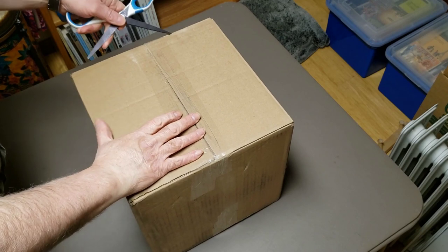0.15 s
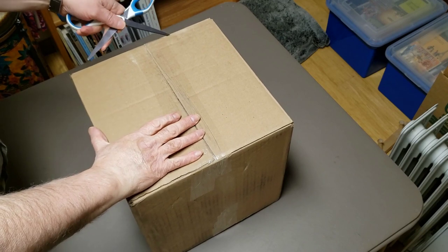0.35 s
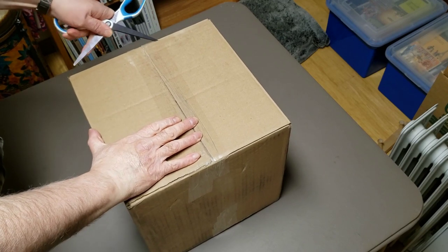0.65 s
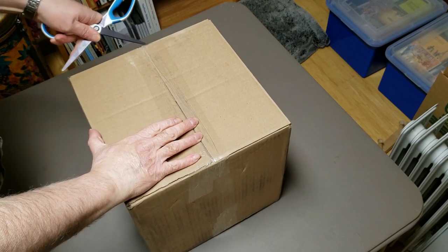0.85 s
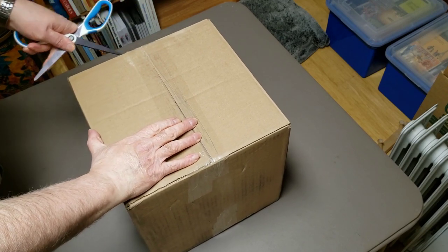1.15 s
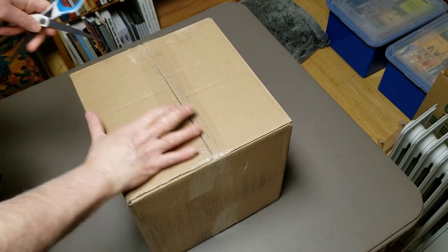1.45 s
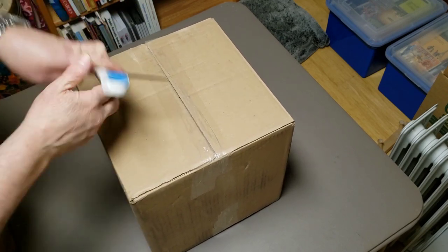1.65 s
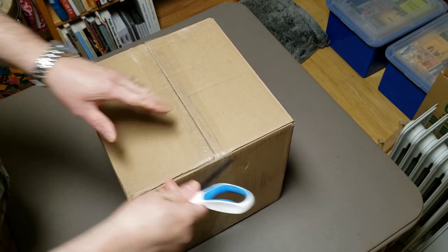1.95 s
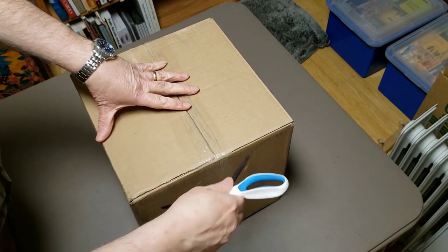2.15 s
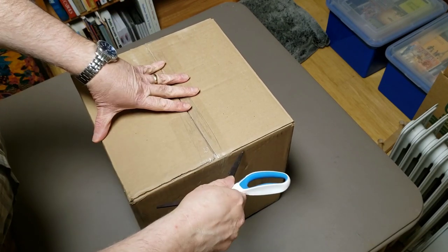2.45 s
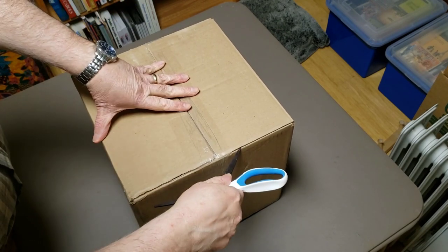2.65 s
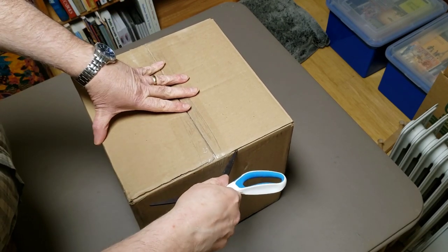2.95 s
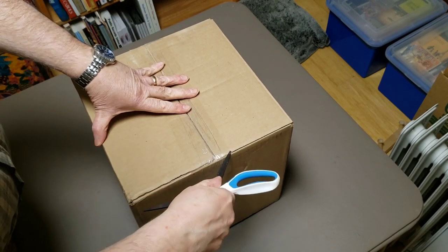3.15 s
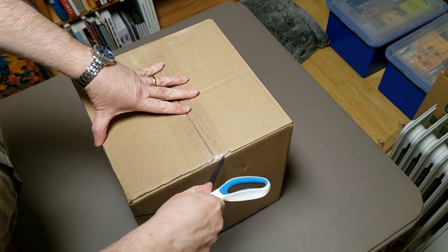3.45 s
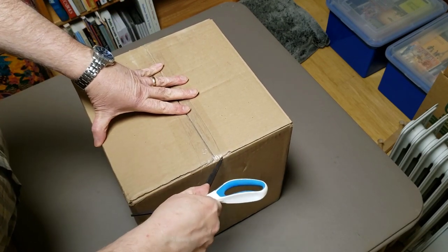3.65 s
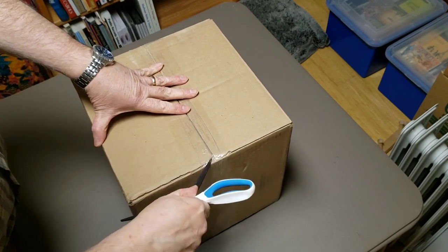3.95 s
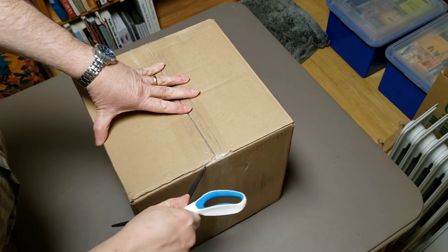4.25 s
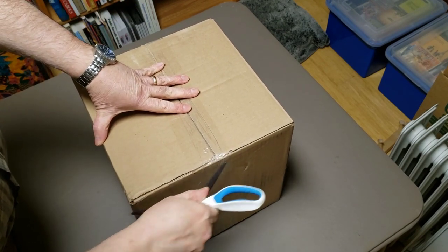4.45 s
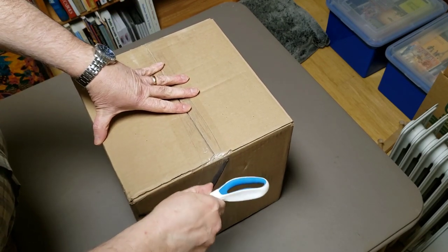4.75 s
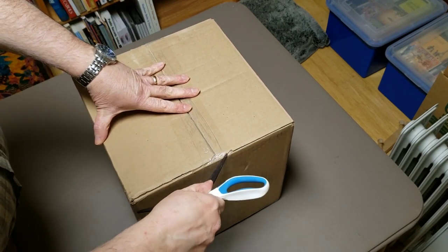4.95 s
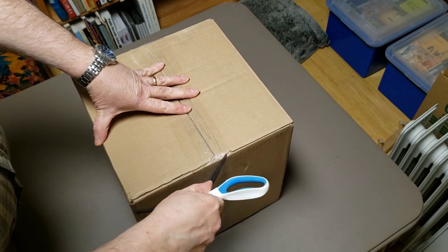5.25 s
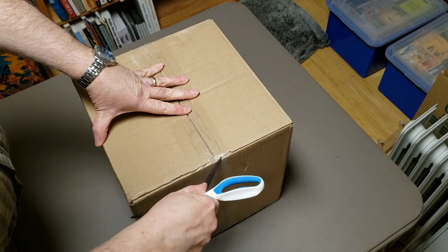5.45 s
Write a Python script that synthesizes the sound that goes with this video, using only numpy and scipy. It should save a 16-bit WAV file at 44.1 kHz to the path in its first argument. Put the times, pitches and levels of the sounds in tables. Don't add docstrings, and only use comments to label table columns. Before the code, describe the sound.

A hand rubs faintly on a cardboard box, then a scissor blade slits the taped lid in loud, uneven jerks, with sharp tape cracks, dry scraping and hollow panel booms. After a near pause with small metal clicks, the blade picks and knocks at the front wall in separated bursts, ending in a stronger push. Close stereo microphone, small furnished room, short reflections and faint hiss.

```python
import sys
import numpy as np
from scipy import signal
from scipy.fft import rfft, irfft, next_fast_len
from scipy.io import wavfile
from scipy.ndimage import uniform_filter1d, map_coordinates

SR = 44100
rng = np.random.default_rng(int(sys.argv[2]) if len(sys.argv) > 2 else 0)


def dump(signal):
    limited = np.clip(np.atleast_2d(signal).T, -1, 1)
    pcm = np.round(limited * 32767).astype(np.int16)
    wavfile.write(sys.argv[1], SR, pcm)


def nominal_scale(level):
    x = np.asarray(level, float) / 20
    return 10 ** x


N = 247401


def unit(x):
    return x / np.sqrt(np.mean(x ** 2) + 1e-20)


def along(points, hz):
    f, v = np.transpose(points)
    return np.interp(np.log(hz + 1), np.log(f + 1), v)


def colour(points):
    return lambda hz: nominal_scale(along(points, hz))


def wobble(rate):
    knots = rng.standard_normal(int(N * rate / SR) + 4)
    return map_coordinates(knots, [np.arange(N) * rate / SR])


def filtered(x, response):
    m = 2 * next_fast_len(N // 2 + SR // 4)
    return irfft(rfft(x, m) * response(np.fft.rfftfreq(m, 1 / SR)), m)[..., :N]


def resonances(modes):
    def response(f):
        total = 0
        for k, (centre, width, db) in enumerate(modes):
            damping = 1j * f * width
            total = total + (-1) ** k * nominal_scale(db) * damping / (centre * centre - f * f + damping)
        return total
    return response


def causal(points):
    def response(hz):
        cepstrum = irfft(np.log(nominal_scale(along(points, hz))))
        half = len(cepstrum) // 2
        return np.exp(rfft(np.r_[cepstrum[0], 2 * cepstrum[1:half], np.zeros(half)]))
    return response


def sides(db):
    return nominal_scale(np.array([db / 2, -db / 2]))


# (frequency [Hz], likeness [0-1])
ALIKE = [(60, 0.86), (200, 0.99), (500, 0.85), (1000, 0.15), (3000, 0.18), (7000, 0.26), (10000, 0.83),
         (15000, 1)]


def spread(pair, response, alike):
    turn = lambda hz: np.arccos(np.clip(along(alike, hz), -1, 1)) / 2
    same, other = filtered(pair, lambda hz: response(hz) * [np.cos(turn(hz)), np.sin(turn(hz))])
    return unit(np.array([same + other, same - other]))


# (time [s], left over right [dB])
PLACE = [(0, -12), (1.4, -4), (1.6, -9.5), (2.3, -5.5), (3.3, -11.5), (4.4, -10), (5.61, -14)]


def blade_place(s):
    return sides(np.interp(s, *np.transpose(PLACE)))


def grit(per_s, spread_db, smooth):
    draw = rng.random((2, 2, N))
    sizes = nominal_scale(-spread_db * np.log(draw[1] + 0.21))
    slips = (draw[0] < per_s / SR) * sizes * np.sign(rng.standard_normal((2, N)))
    return np.sqrt(1 - smooth) * unit(slips) + np.sqrt(smooth) * rng.standard_normal((2, N))


def patchy(pair, depth_db):
    z = signal.stft(pair, nperseg=256)[2]
    field = uniform_filter1d(rng.standard_normal(z.shape[1:]), size=4, axis=0)
    field = uniform_filter1d(field, size=7, axis=1)
    return signal.istft(z * nominal_scale(depth_db * unit(field)), nperseg=256)[1][:, :N]


def contact(rows, fall_db_s, idle_db, shared):
    t = np.arange(0, N + 20, 20) / SR
    idle = idle_db + 6.5 * wobble(11.0)
    s, swell_s, hold_s, db, share_db = np.transpose(rows)[..., None]
    before = np.clip(s - t, 0, None)
    after = np.clip(t - s - hold_s, 0, None)
    swell_db = 25 * (before / np.clip(swell_s, .004, None)) ** 1.42
    level_db = db + shared * share_db - swell_db - fall_db_s * after
    power = nominal_scale(2 * level_db).sum(axis=0)
    return np.sqrt(nominal_scale(2 * idle) + np.interp(np.arange(N) / SR, t, power))


# (from [s], to [s])
BLADE_ON_LID = [
    (0, 1.95),
]


def lid_then_front(lid, front, spans=BLADE_ON_LID):
    t = np.arange(N) / SR
    inside = np.any([(start <= t) & (t < end) for start, end in spans], axis=0)
    return np.where(inside, lid, front)


# (centre [Hz], width [Hz], level [dB])
PANELS = [(151.5, 9.2, 1), (190.4, 25, -1.5), (229.4, 32.3, 0.5), (293.8, 23, 4), (367, 30, 1.5),
          (455, 74, -4), (545, 65, -4.5), (770, 41, -6), (1084, 220, -14.5)]
# (centre [Hz], width [Hz], level [dB])
FRONT = [(141, 22, -8.5), (172, 26, -6), (225.2, 16.6, -0.5), (255.4, 15.6, -2.5), (288, 14.3, -5.5),
         (347.5, 13.2, -7.5), (451, 33, -21), (557, 37, -14.5), (757, 194, -25.5)]
# (centre [Hz], width [Hz], level [dB])
SIDE_WALL = [(155, 49, -13), (240, 17, -0.5), (300.4, 20.6, 0.5), (334, 13, -4.5), (425, 50, -14.5),
             (600, 130, -16.5), (727, 124, -16), (1126, 67, -20.5)]
# (from [s], to [s])
ON_LID = [
    (0, .4),
    (.645, 1.95),
    (4.81, 4.95),
]
# (from [s], to [s])
ON_SIDE_WALL = [
    (.4, .645),
    (2.1, 2.315),
]


def panel_modes(through):
    flat = lid_then_front(through(PANELS), through(FRONT), ON_LID)
    return lid_then_front(through(SIDE_WALL), flat, ON_SIDE_WALL)


# (frequency [Hz], density [dB per Hz])
HUSH = [(15, -27), (25, 3.5), (409, -3.5), (444, -2), (537, -6.5), (582, -10), (1120, -10), (2970, -12.5),
        (9280, -26.5), (15100, -12), (16400, -38)]
# (frequency [Hz], likeness [0-1])
HUSH_ALIKE = [(100, 0.28), (1000, 0.034), (5000, 0.032), (15000, 0.18)]


def hush():
    return nominal_scale(-64) * spread(rng.standard_normal((2, N)), colour(HUSH), HUSH_ALIKE)


# (frequency [Hz], time to fall 60 dB [s])
ROOM = [(150, 0.29), (1000, 0.21), (4000, 0.24), (10000, 0.28), (16000, 0.67)]
# (time [s], level [dB])
WALLS = [(.0065, -11), (.0085, 1.5), (0.018, -2), (.018, -5)]


def room(x, echo_db, tail_db):
    hz, t, z = signal.stft(rng.standard_normal((3, SR // 2)), SR, nperseg=256)
    apart = np.sqrt(1 - np.clip(along(ALIKE, hz), 0, 1))[:, None]
    z = z[2] + z[:2] * apart * 4.7
    tail = signal.istft(z * nominal_scale(-60 * t / along(ROOM, hz)[:, None]), SR, nperseg=256)[1]
    tail = nominal_scale(tail_db) * tail / np.linalg.norm(tail[0])
    answer = np.pad(tail, ((0, 0), (250, 0)))
    for s, db in WALLS:
        answer[:, round(s * SR)] += nominal_scale(db + echo_db)
    return signal.fftconvolve(x, answer, axes=1)[:, :N]


# (time [s], peak level [dB], thud share [dB])
KNOCKS = [(0.067, -63, -11), (0.45, -15, -17), (0.689, -22, -18), (0.74, -17.5, -34), (0.822, -51, -11),
          (1.155, -13, -33), (1.253, -25, -6), (2.156, -38, -30), (2.18, -15.5, -34), (2.326, -31.5, -8),
          (2.619, -45, -10), (2.939, -44, -15), (2.983, -36.5, -15), (3.038, -22, -23), (3.233, -29.5, -23),
          (3.415, -26.5, -27), (3.711, -37, -25), (3.742, -15.5, -23), (3.775, -14.5, -7),
          (4.182, -34, -11), (4.657, -36, -17), (4.827, -39, -19), (5.019, -30, 4), (5.345, -35.5, -23),
          (5.431, -23, -20), (5.488, -19, -17), (5.539, -17.5, -17),
          (0.488, -18.5, -22), (0.509, -38, -20), (.522, -15, -20), (0.555, -20, -20), (.748, -20, -2),
         (0.754, -22, -10), (0.833, -18, -15), (0.848, -24, -9), (.902, -28, -14), (1.078, -24, -7),
         (1.196, -29, 2), (1.307, -30, -3), (0.985, -34, -12), (1.047, -42, -14), (1.282, -15, 3),
         (2.167, -21.5, -17), (2.202, -24.5, -20), (2.24, -26, -17), (3.047, -18, -12), (3.073, -26, -15),
         (3.128, -21, -15), (3.264, -33, -22), (3.327, -27.5, -20), (3.377, -28, -23), (3.439, -26.5, -20),
         (3.783, -28, -11), (3.799, -28, -5), (3.852, -22, -2), (4.218, -34.5, -16), (4.262, -39, -12),
         (4.85, -36.5, -18), (4.999, -32.5, -14), (5.562, -19.5, -15), (5.58, -20, -7), (5.605, -12.5, -3)]
# (centre [Hz], width [Hz], level [dB])
TABLE = [(56, 14, 2), (88.8, 10.4, 7), (149.4, 12, -2.5)]


def knocks():
    panel, table = np.zeros((2, N))
    for s, db, thud_db in KNOCKS:
        panel[round(s * SR)] = -nominal_scale(db + 36)
        table[round(s * SR)] = nominal_scale(db + thud_db + 24)
    soft = lambda hz: 1 / (1 + 1j * hz / 600) ** 3
    together = lambda modes: lambda hz: soft(hz) * sum(resonances([mode])(hz) for mode in modes)
    boom = panel_modes(lambda modes: filtered(panel, together(modes)))
    return boom + filtered(table, lambda hz: soft(hz) * resonances(TABLE)(hz))


# (time [s], peak level [dB])
PIVOT = [(1.5278, -24), (1.5336, -31), (1.5355, -33), (1.54, -35), (1.5452, -33), (1.77, -40), (1.771, -41),
         (2.1665, -32), (.2205, -44), (.6893, -19), (3.7405, -33), (5.4328, -42)]
# (centre [Hz], width [Hz], level [dB])
STEEL = [(5500, 1800, -3), (10300, 2200, 1.5), (14000, 3000, -4)]


def pivot():
    blows = np.zeros(N)
    for s, db in PIVOT:
        blows[round(s * SR)] = nominal_scale(db + 14)
    ring = lambda hz: resonances(STEEL[:1])(hz) + resonances(STEEL[1:])(hz)
    return sides(-5)[:, None] * filtered(blows, ring)


# (time [s], peak level [dB])
TAPE_TICKS = [(3.0695, -40), (3.204, -48), (3.232, -38), (3.261, -43), (5.4954, -48), (5.595, -44)]
# (centre [Hz], width [Hz], level [dB])
TAPE_SKIN = [(10400, 3300, 3.5), (13500, 2100, -11)]


def tape_ticks():
    blows = np.zeros(N)
    for s, db in TAPE_TICKS:
        blows[round(s * SR)] = nominal_scale(db + 16)
    return sides(-6)[:, None] * filtered(blows, lambda hz: resonances(TAPE_SKIN)(hz) ** 2)


# (time at full strength [s], swell [s], hold [s], tape rustle level [dB], card body over it [dB])
DRAGS = [(.452, 0.013, 0.036, -63.5, 16), (.52, .05, 0.052, -56.5, 6), (1.78, .01, 0.033, -65, -19),
         (2.17, 0.0052, .03, -51, -2), (2.206, 0.022, 0.036, -55, -7), (3.05, .012, 0.064, -63, 9),
         (3.744, 0.0056, 0.0092, -59, 8), (3.776, .02, 0.013, -67, 14), (4.75, 0.082, 0.015, -80.5, 14),
         (5.44, 0.007, .1, -73, 7.5)]
# (centre [Hz], width [Hz], level [dB])
LOOSE_TAPE = [(4120, 1100, -0.18), (5860, 3000, -1.8)]
# (centre [Hz], width [Hz], level [dB])
BARE_CARD = [(597, 200, -6), (853, 177, 1), (1164, 220, -3.5), (1710, 230, -4.5)]


def drags():
    fall_db_s, idle_db = 247, -140
    steep = lambda modes: lambda hz: resonances(modes)(hz) ** 2
    slips = patchy(grit(700, 3, smooth=0.63), depth_db=4.5)
    rustle = contact(DRAGS, fall_db_s, idle_db, False) * spread(slips, steep(LOOSE_TAPE), ALIKE)
    body = contact(DRAGS, fall_db_s, idle_db, True) * spread(slips, steep(BARE_CARD), ALIKE)
    return rustle + body


# (time [s], peak level [dB], pitch [Hz])
CRACKLES = [(.105, -50, 1010), (0.129, -51, 1070), (.15, -49, 880), (.345, -52.5, 724),
            (0.453, -32.5, 3970), (.5, -43, 1120), (0.531, -44, 1240), (0.661, -35, 2860), (.451, -30, 800),
            (.689, -24, 1670), (.741, -19.5, 2680), (.742, -21, 4700), (.749, -48, 1200), (.797, -40, 1550),
            (.821, -18, 2850), (.823, -22, 1460), (.826, -38, 5030), (.904, -30, 970), (.905, -28, 2980),
            (.911, -37, 4500), (.96, -25, 2860), (.997, -40, 5496), (1.047, -42, 2280), (1.084, -26, 2840),
            (1.157, -21, 3500), (1.192, -32, 2090), (1.258, -39, 2934), (1.284, -25, 1400),
            (1.306, -27, 1800), (1.318, -19.5, 3230), (1.328, -16.5, 1010), (1.345, -21, 1097),
            (1.384, -27.5, 1830), (2.167, -28, 5200), (2.168, -51, 918), (2.18, -39, 5500),
            (2.204, -27.5, 5300), (2.23, -37, 5270), (2.25, -52, 4700), (2.204, -33.5, 3490),
            (2.323, -54, 890), (3.04, -45, 1640), (3.083, -51, 1780), (4.21, -54, 293), (3.12, -40, 1190),
            (4.26, -56, 290), (3.711, -46, 3700), (3.79, -30, 560), (3.8, -41, 1290), (3.741, -31, 1650),
            (3.768, -40, 1600), (3.778, -28.5, 600), (4.656, -48, 770), (4.994, -55.5, 600),
            (4.829, -48, 1040), (4.831, -46.5, 1660), (5.434, -52, 1500), (5.541, -50, 1640),
            (5.606, -27.5, 1580), (5.607, -35, 2530)]


def crackles():
    out, t = np.zeros((2, N + SR)), np.arange(SR // 20) / SR
    for s, db, hz in CRACKLES:
        rough = 1 + 1.5 * uniform_filter1d(rng.standard_normal((2, len(t))), size=9, axis=1)
        fall = nominal_scale(db - 60 * t * hz / 28)
        rise = 1 - np.exp(-t * hz / 0.68)
        out[:, round(s * SR):][:, :len(t)] += rough * fall * rise * np.sin(2 * np.pi * hz * t)
    return out[:, :N]


# (time at full strength [s], swell [s], hold [s], tape fizz level [dB], card scrape over it [dB])
LID_CUTS = [(0.088, 0.23, 0.052, -57.5, 1.5), (0.225, 0.005, 0.049, -53, -8), (0.36, 0.16, 0.082, -69, 3.5),
            (0.425, 0.018, 0.14, -54, 3.5), (0.444, .006, 0.11, -62, -1), (0.516, 0.058, 0.03, -47.5, 6),
            (0.605, 0.043, 0.03, -52.5, 5), (0.653, 0.0051, 0.14, -45, 3), (0.69, 0.005, 0, -35.5, 10.5),
            (0.745, 0.062, 0.065, -39, 7), (0.811, 0.0051, 0.064, -44.5, 8), (0.901, 0.005, 0.015, -35, 9),
            (0.974, 0.21, 0.024, -40.5, 5), (1.072, 0.082, 0.015, -38.5, 6.5),
            (1.152, 0.0093, 0.043, -32, 4.5), (1.25, 0.013, 0.055, -37.5, 8),
            (1.309, 0.078, 0.047, -29, 5.5), (1.396, 0.13, 0.096, -48, 3), (1.537, 0.015, 0, -38, -12),
            (1.783, 0.068, 0.051, -52, -10), (1.886, 0.23, 0.31, -71.5, 5)]
# (time at full strength [s], swell [s], hold [s], tape fizz level [dB], card scrape over it [dB])
WALL_CUTS = [(2.168, 0.004, 0.067, -56.5, -0.5), (2.252, .04, 0.047, -60, -1),
             (2.326, 0.0067, 0.0083, -55.5, -1), (2.53, 0.2, 0.052, -67.5, -3), (3.02, 0.21, 0, -66, -2),
             (3.045, 0.023, 0.059, -44, -1), (3.116, 0.066, 0.0037, -41, -2.5),
             (3.2, 0.034, 0.011, -57, -11), (3.24, 0.03, 0.042, -51, -7), (3.43, 0.12, 0.0078, -54.5, -2.5),
             (3.711, 0.0061, 0.11, -48, -3), (3.767, 0.037, 0, -37, 6), (4.124, 0.057, 0.078, -64, -4.5),
             (4.32, 0.32, 0.037, -64, -1.5), (4.15, 0.021, .04, -65, -1), (4.742, 0.015, 0.047, -62.5, -8),
             (4.828, 0.026, 0, -47.5, -10), (5.436, 0.015, 0.028, -54, -2), (5.5, 0.05, 0.12, -58, 0),
             (5.608, 0.0038, 0.054, -35, 4)]
SCRAPE_FALL_DB_S = 297


def fibres():
    count, t = int(200 * N / SR), np.arange(SR // 40) / SR
    start = rng.integers(0, N, count)
    size = rng.exponential(size=count)
    pitch, pan = rng.standard_normal((2, count, 1))
    hz = np.clip(2300 * 2 ** (.7 * pitch), 900, 7000)
    fall = nominal_scale(5 * np.clip(size, 0, 3)[:, None] - 60 * t * hz / 18)
    ring = fall * np.sin(2 * np.pi * hz * t) * np.sqrt(1000 / hz)
    at = (start[:, None] + np.arange(len(t))).ravel()
    pair = np.array([np.bincount(at, (ring * nominal_scale(side * 3 * pan)).ravel(), N + SR)[:N] for side in (1, -1)])
    return nominal_scale(-9) * contact(LID_CUTS + WALL_CUTS, SCRAPE_FALL_DB_S, -140, True) * unit(pair)


# (time at full strength [s], swell [s], hold [s], panel level [dB], share passed to the table [dB])
LID_LOADS = [(.068, 0.049, 0.024, -60.5, 11.5), (.258, 1, 0.0047, -61, -10), (.372, 0.047, 0.096, -61, -4),
             (.452, 0.01, 0.09, -34, -11.5), (.61, 0.026, 0.0032, -44, -17),
             (.662, 0.029, 0.045, -41.5, -2), (.69, 0.014, 0.032, -32, -11),
             (.755, 0.033, 0.0093, -32, 1.5), (.828, 0.029, 0.029, -30.5, 0.5),
             (.904, 0.0072, 0, -33.5, -1.5), (.94, 0.073, 0.056, -35.5, -0.5),
             (.995, 0.035, 0.11, -33.5, -2), (1.158, 0.02, 0.0072, -25, -6.5),
             (1.2, 0.041, 0.075, -37.5, 10), (1.264, 0.018, 0.11, -29.5, -8.5), (1.42, 0.24, 0.08, -46, -6),
             (1.771, 0.027, 0.055, -62.5, -7)]
# (time at full strength [s], swell [s], hold [s], panel level [dB], share passed to the table [dB])
WALL_LOADS = [(2.16, 0.0096, 0.026, -38.5, -6.5), (2.333, 0.0097, 0.1, -56, 10),
              (2.535, 0.39, 0, -62.5, -7), (2.641, 0.049, 0, -63.5, 5), (2.947, 0.051, 0.11, -48.5, -12),
              (3.041, 0.053, 0.087, -36, -6.5), (3.246, 0.062, 0.14, -46.5, -10.5),
              (3.417, 0.012, 0.031, -37.5, -7), (3.716, 0.0066, 0.062, -41, -29),
              (3.778, 0.013, 0, -22.5, -4.5), (3.956, 0.068, 0, -79, 26), (4.119, 0.013, 0.0092, -59, -5),
              (4.19, 0.02, 0.083, -55, -8), (4.382, 0.21, 0, -57.5, -1.5), (4.659, 0.005, 0.12, -50.5, 1),
              (4.827, 0.011, 0.019, -42.5, -11), (4.996, 0.0076, 0.032, -52.5, 7.5),
              (5.338, 0.011, 0.073, -52, -22), (5.437, 0.005, 0.0023, -31, -16),
              (5.514, 0.15, 0.11, -44, 1.5), (5.61, 0.014, 0.012, -32, -20)]
# (frequency [Hz], density [dB per Hz])
SCRAPE = [(350, -2), (600, -11), (745, 3), (916, -8), (1090, -10), (1170, -12.5), (1830, -9), (2110, -17),
          (2890, -12.5), (6650, -14), (8000, -19), (10400, -31.5), (17600, -120)]
# (frequency [Hz], density [dB per Hz])
WALL_SCRAPE = [(350, -7), (600, 1), (640, -68), (729, -3.5), (1070, -14), (1280, -9), (1800, -15.5),
               (2050, -26), (2500, -15), (3020, -25), (4700, -16.5), (8000, -18.5), (10400, -40),
               (17600, -120)]
# (frequency [Hz], density [dB per Hz])
FIZZ = [(4590, -62), (7800, -16.5), (9820, 1.5), (12200, 2.5), (15700, -6.5), (16200, -38), (16400, -38)]
# (frequency [Hz], density [dB per Hz])
WALL_FIZZ = [(4590, -81), (7800, -13), (9820, 3.5), (14800, -1), (16100, 3), (16400, -6)]
# (frequency [Hz], density [dB per Hz])
BRUSH_FIZZ = [(4590, -63), (6500, -31.5), (8000, -19.5), (9500, 5), (11500, 6.5), (12500, -5), (16400, -3)]
# (from [s], to [s])
BRUSHING = [
    (3.33, 3.6),
    (4, 5.7),
]


def strokes():
    loads, cuts = LID_LOADS + WALL_LOADS, LID_CUTS + WALL_CUTS
    jerk = np.clip(wobble(35), -3, 1.2)

    thud = spread(grit(150, 1.3, smooth=0.22), lambda hz: resonances(TABLE)(hz) * hz / (hz + 60), ALIKE)
    rub = grit(400, 11.6, smooth=0.64)
    boom = panel_modes(lambda modes: spread(rub, resonances(modes), ALIKE))
    rasp = patchy(grit(500, 4.8, smooth=0.42), depth_db=2.0)
    scrape = lid_then_front(spread(rasp, colour(SCRAPE), ALIKE), spread(rasp, colour(WALL_SCRAPE), ALIKE))
    tear = patchy(grit(2500, 3.1, smooth=0.98), depth_db=3.0)
    fizz = lid_then_front(spread(tear, colour(FIZZ), ALIKE), spread(tear, colour(WALL_FIZZ), ALIKE))
    fizz = lid_then_front(spread(tear, colour(BRUSH_FIZZ), ALIKE), fizz, BRUSHING)

    thud = contact(loads, 191, -84, True) * thud
    boom = contact(loads, 250, -103, False) * nominal_scale(0.25 * jerk - 2.5) * boom
    scrape = contact(cuts, SCRAPE_FALL_DB_S, -73.5, True) * nominal_scale(1.5 * jerk - 5) * scrape
    flutter = nominal_scale(2 * jerk + 0.12 * wobble(91) - 3.5)
    fizz = contact(cuts, 282, -85.5, False) * flutter * blade_place(np.arange(N) / SR) * fizz
    return thud + boom + scrape + fizz


# (time [s], peak level [dB], card rasp share [dB], fizz level [dB])
LID_SNAPS = [(0.064, -51, -4, -22), (0.22, -41.5, -20, -5.5), (0.413, -55, 5.5, 2), (.448, -41.5, -5, -1.5),
             (0.65, -44, 14, -11), (0.689, -23, 1, -5), (0.7403, -20.5, 1.5, -6), (.82, -29.5, 4.5, 1.5),
             (0.904, -16.5, -42, -12.5), (0.9943, -28.5, 0.5, 0.5), (1.0427, -39, 9, 3.5),
             (1.135, -38.5, 7, -3), (1.145, -37, 2, 7), (1.155, -23.5, 1, -2.5), (1.253, -32.5, 2.5, 3),
             (1.283, -31.5, 9, -1), (1.5273, -33, -36, -21), (1.7695, -36.5, -17, -6)]
# (time [s], peak level [dB], card rasp share [dB], fizz level
# [dB])
WALL_SNAPS = [(2.1662, -29.5, -1.5, -2.5), (2.2026, -33, 0.5, -6), (2.324, -44, -18, -25),
              (2.495, -52, -3, -2.5), (3.039, -32, -3, -15), (3.07, -39, -24, 0.5), (3.232, -39, -16, -12),
              (3.263, -52, -23, -25), (3.711, -34.5, -5.5, -7.5), (3.7398, -31, -1, -15),
              (3.772, -49, -13, -14), (4.6554, -67, -1, 1), (4.813, -45, -13, -16), (4.828, -41, -3, -24),
              (4.994, -48.5, -11, -12), (5.4339, -41, 6.5, -11.5), (5.4958, -59, -20, -21),
              (5.542, -51, 5, -16), (5.6064, -17.5, -7.5, -28)]
# (frequency [Hz], density [dB per Hz])
CRACK = [(1470, -77), (2500, -17), (4960, -8.5), (5670, -11), (7640, -21.5), (9830, -2), (11300, -1.5),
         (15300, -16), (16400, -23)]


def snaps():
    high, mid, t = np.zeros((2, N + SR)), np.zeros((2, N + SR)), np.arange(SR // 3) / SR
    for s, db, mid_db, fizz_db in LID_SNAPS + WALL_SNAPS:
        noise = rng.standard_normal(len(t)) + 0.53 * rng.standard_normal((2, len(t)))
        burst = nominal_scale(fizz_db - 9.0 - 60 * t / 0.17) * noise
        burst += nominal_scale(-60 * t / .0012) * np.cos(np.pi * t * SR * rng.uniform(.3, .6))
        start = round((s + .0003) * SR)
        high[:, start:][:, :len(t)] += nominal_scale(db) * blade_place(s)[:, None] * burst
        mid[:, start:][:, :len(t)] += nominal_scale(db + mid_db) * (burst * nominal_scale(1 - 60 * t / 0.1) + 1.1 * (t == 0))
    card = filtered(mid[:, :N], causal(SCRAPE))
    return nominal_scale(9.5) * filtered(high[:, :N], causal(CRACK)) + nominal_scale(18.5) * card


# (frequency [Hz], phase by which left leads [radians])
LEAD = [(100, 0), (1000, .6), (3000, 2), (5500, 3.1), (9500, 5.8), (12000, 6.3), (16000, 6.6)]
# (frequency [Hz], phase by which left leads [radians])
WALL_LEAD = [(300, 0.11), (1500, 1.48), (16000, 1.36)]


def scene():
    ticks = snaps()
    pushes = sides(1)[:, None] * knocks() + crackles()
    rubbing = strokes() + drags() + fibres()
    clicks = pivot() + tape_ticks()
    sharp_answer = room(ticks + clicks, echo_db=-32.0, tail_db=-4.0)
    dull_answer = room(pushes + rubbing, echo_db=-19.5, tail_db=-10)
    box = ticks + sharp_answer + pushes + rubbing + dull_answer
    late = filtered(box[1], lambda hz: np.exp(-1j * np.array([along(LEAD, hz), along(WALL_LEAD, hz)])))
    return np.array([box[0], lid_then_front(*late)]) + clicks + hush()


def top_cut(x):
    return signal.sosfilt(signal.butter(12, 16830, fs=SR, output="sos"), x)


# (frequency [Hz], level [dB])
PORT = [(15, -34), (30, -6), (58, -3), (6800, -5.5), (7900, -10), (8900, -2), (15750, -3), (15950, -42),
        (16800, -53)]


def record(dry):
    heard = filtered(dry, colour(PORT))
    heard = heard / (1 + np.abs(heard / .24) ** 4) ** (1 / 4)
    return top_cut(heard)


dry = scene()
out = record(dry)
dump(out)
```